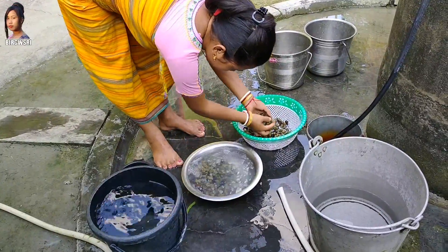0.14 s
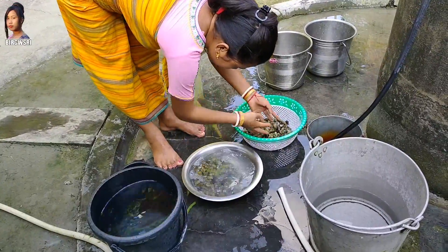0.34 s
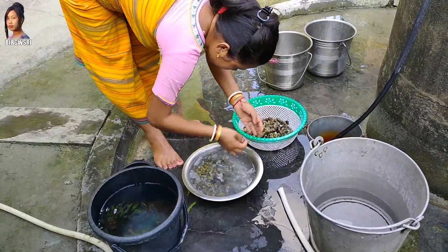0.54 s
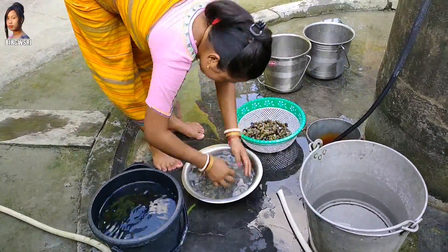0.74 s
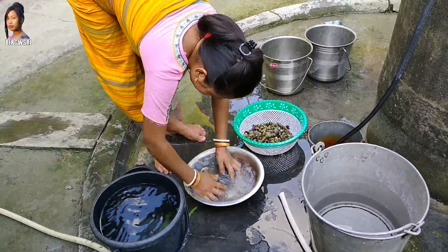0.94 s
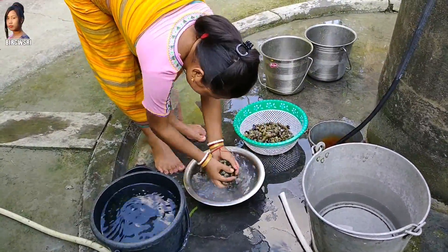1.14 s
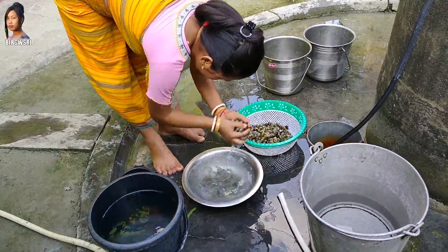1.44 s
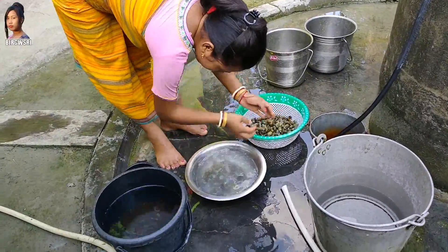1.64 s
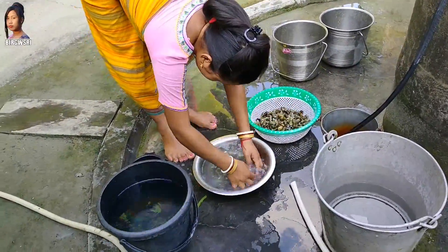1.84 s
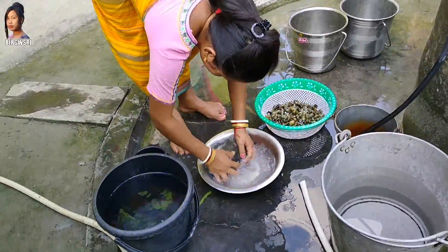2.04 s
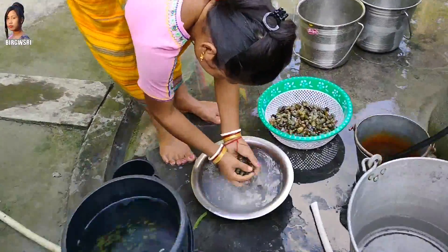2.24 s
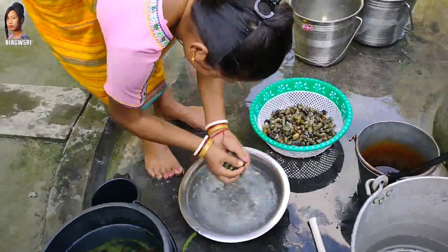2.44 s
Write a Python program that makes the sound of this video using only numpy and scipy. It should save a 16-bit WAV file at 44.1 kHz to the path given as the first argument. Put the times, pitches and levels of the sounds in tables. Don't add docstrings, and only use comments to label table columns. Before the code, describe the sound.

Handfuls of hard little snail shells rattle, scrape and drop, with small watery plops, outdoors

```python
import sys
import numpy as np
from scipy import signal
from scipy.fft import rfft, irfft, next_fast_len
from scipy.io import wavfile
from scipy.ndimage import uniform_filter1d

SR = 44100
rng = np.random.default_rng(int(sys.argv[2]) if len(sys.argv) > 2 else 0)


def boost(x):
    u = np.asarray(x, float) / 20
    return 10 ** u


def file_out(sig):
    cols = np.atleast_2d(sig).T
    lim = np.clip(cols, -1, 1)
    pcm = np.round(lim * 32767).astype(np.int16)
    wavfile.write(sys.argv[1], SR, pcm)


N = 114660
CUT_S = 0.8095


def evened(x):
    return x / np.sqrt(np.mean(x ** 2) + 1e-20)


def read(points, hz):
    point_hz, value = np.transpose(points)
    return np.interp(np.log(hz + 1), np.log(point_hz + 1), value)


def colour(x, db_of):
    log_gain = np.log(boost(db_of(abs(np.fft.fftfreq(4096, 1 / SR)))))
    taps = np.fft.ifft(np.exp(np.conj(signal.hilbert(log_gain)))).real[:2048]
    return signal.oaconvolve(x, taps[None], axes=1)[:, :N]


def wobble(grain_s):
    size = max(int(grain_s * SR), 1)
    drift = uniform_filter1d(rng.standard_normal(N), size)
    return evened(uniform_filter1d(drift, size))


def rung(x, modes):
    t = np.arange(5000) / SR
    taps = sum(boost(db - 60 * t / t60_s) * np.sin(2 * np.pi * hz * t) for hz, db, t60_s in modes)
    return evened(signal.oaconvolve(x, taps[None], axes=1)[:, :N])


# pitch_hz, density_db_per_hz
YARD_HUM = [(100, -2.5), (400, 1), (1000, -2), (2300, -17.5), (3700, 15.5), (4600, -28), (10000, -10),
            (15500, -19)]
# pitch_hz, density_db_per_hz
WIND_TONE = [(15, -9), (50, 5.5), (100, -10), (220, -13), (500, -34)]
# time_s, level_db
GUSTS = [(0.0, -49), (0.22, -51), (0.27, -41), (0.3, -52), (0.6, -47), (0.83, -51.5), (0.85, -45),
         (1.04, -40), (1.06, -61), (1.12, -35.5), (1.23, -51), (1.34, -40), (1.83, -47), (2.6, -43.5)]


def outdoors():
    t = np.arange(N) / SR
    hum = colour(rng.standard_normal((2, N)), lambda hz: read(YARD_HUM, hz) - 30 * (hz < 60))
    wind = colour(rng.standard_normal((2, N)), lambda hz: read(WIND_TONE, hz) - 40 * (hz > 700))
    hum_db = -46.5 + 3.7 * wobble(0.039) + 5 * (t > CUT_S)
    gust_db = np.interp(t, *np.transpose(GUSTS))
    return boost(hum_db) * evened(hum) + boost(gust_db) * evened(wind)


# start_s, level_db, pitch_hz, t60_s
PLOPS = [
    (0.098, -41, 395, 0.018),
    (0.832, -29.5, 480, 0.038),
    (2.385, -23, 211, 0.046),
]


def plops():
    out, t = np.zeros(N + 4000), np.arange(4000) / SR
    for start_s, level_db, pitch_hz, t60_s in PLOPS:
        at = round(start_s * SR)
        envelope = boost(level_db - 60 * t / t60_s) * np.minimum(t / 0.0016, 1)
        out[at:at + 4000] += envelope * np.sin(2 * np.pi * pitch_hz * t * (1 + 0.81 * t))
    return np.array([out[:N], 0.77 * out[:N]])


# pitch_hz, density_db_per_hz
SHELL_TONE = [(150, -25), (500, -18), (1300, -13), (2400, -1), (4200, -6.5), (6300, -0.5), (9500, -14.5),
              (15500, -38.5)]


def shell_colour(x):
    return colour(x, lambda hz: read(SHELL_TONE, hz))


# start_s, peak_db, pitch_hz, length_s, crack_db
SINGLE_KNOCKS = [(0.0746, -20, 2500, 0.0033, -5.5), (0.186, -8.5, 1870, 0.0031, -6),
                 (0.532, -2.5, 2020, 0.0011, -46), (0.747, -23, 8400, 0.0049, -23),
                 (0.752, -17, 2120, 0.0057, -6.5), (0.78, -13, 7850, 0.0044, -13), (0.7885, -7, 5570, 0.0048, -6.5),
                 (0.792, -7.5, 4470, 0.0041, -6.5), (0.827, -20.5, 1840, 0.0053, -10),
                 (0.836, -22.5, 1370, 0.007, -6.5), (0.947, -12, 2260, 0.003, -7), (1.004, -6, 2520, 0.0028, -14),
                 (1.79, -19.5, 2430, 0.011, -11), (1.939, -21, 2300, 0.0016, -16), (2.149, -13, 2170, 0.0063, -10),
                 (2.5279, 0, 1480, 0.0055, -22),
                 (2.308, -2, 1380, 0.0093, -21), (2.528, -20.5, 600, 0.024, -28), (2.536, -7.5, 1420, 0.011, -14),
         (2.519, -16.5, 2400, 0.015, 0), (2, -18, 2300, .006, -12), (.923, -27, 2400, .01, -15),
         (2.386, -21.5, 1020, 0.041, 0), (2.49, -19, 1770, 0.0093, -4), (.886, -26.5, 2640, 0.037, -13.5),
         (1.3625, -1, 3300, 0.015, -26), (2.318, -8, 2350, 0.032, -14), (.12, -27.5, 1860, 0.056, -20),
         (1.638, -6, 9000, .002, -2)]
# start_s, peak_db, pitch_hz, length_s
MORE_KNOCKS = [(0.2233, -12, 6740, 0.015), (0.2406, 7, 940, 0.0046), (0.2696, 4.5, 1136, 0.018),
               (1.05, -12, 2650, 0.02), (1.075, -7.5, 2400, 0.014), (1.116, -2.5, 2420, 0.011),
               (1.153, -5, 5670, 0.01), (1.1676, -5, 2570, 0.032), (1.265, -3, 2860, 0.017),
               (1.283, -6, 2650, 0.014), (1.323, -4.5, 2550, 0.02), (1.3615, 1, 5060, 0.011),
               (1.401, -9.5, 2720, 0.018), (1.45, -12, 2400, 0.023), (1.612, -13.5, 6160, 0.014),
               (1.643, 2, 5800, 0.0022), (2.207, -14, 2220, 0.008), (2.2315, -6.5, 2340, 0.024),
               (2.276, -0.5, 2460, 0.018), (2.429, -9.5, 2550, 0.01)]


def knocks():
    ring, crack = np.zeros((2, N + 2000)), np.zeros((2, N + 2000))
    t = np.arange(2000) / SR
    common_crack_db = -4.5
    more_knocks = [(*row, common_crack_db) for row in MORE_KNOCKS]
    for start_s, peak_db, pitch_hz, length_s, crack_db in [*SINGLE_KNOCKS, *more_knocks]:
        u = t / max(length_s, 0.001)
        envelope = np.minimum(u / 0.12, 1) * boost(peak_db - 17 * u ** 1.4)
        ring_burst, crack_burst = rng.standard_normal((2, 2, 2000)) * envelope
        radius = np.exp(-np.pi * 0.4 * pitch_hz / SR)
        poles = [1, -2 * radius * np.cos(2 * np.pi * pitch_hz / SR), radius * radius]
        tone = signal.lfilter([1, 0, -1], poles, signal.lfilter([1], poles, ring_burst))
        at = round(start_s * SR)
        ring[:, at:at + 2000] += tone * np.std(ring_burst) / np.std(tone)
        crack[:, at:at + 2000] += boost(crack_db) * crack_burst
    return boost(-11) * ring[:, :N] + boost(2.0) * shell_colour(crack)


def swarm(per_s, low_hz, high_hz, t60_s, tick, spread_db, kinds):
    size = boost(spread_db * np.minimum(rng.exponential(1, N), 4))
    hits = size * (rng.random(N) < per_s / SR)
    kind = rng.integers(0, kinds, N)
    t, out = np.arange(1500) / SR, np.zeros((2, N))
    for k in range(kinds):
        place, phase = rng.random((2, 2, 5, 1))
        ring_hz = low_hz * (high_hz / low_hz) ** place
        rings = np.sin(2 * np.pi * (ring_hz * t + phase)).sum(1) * boost(-60 * t / t60_s)
        snap = rng.standard_normal((2, len(t))) * boost(-60 * t / 0.0064)
        impact = evened(rings) + tick * evened(snap)
        out += signal.oaconvolve((hits * (kind == k))[None], impact, axes=1)[:, :N]
    return out


# time_s, swell_db
SURGES = [(0.198, 7.5), (0.2412, 15), (0.252, -10.5), (0.2711, -2), (0.2824, 4.0), (0.3004, 12),
          (0.3184, 13), (0.329, 3.8), (0.371, 4), (0.4005, 5), (0.423, 5), (0.4377, 5), (0.47, 4.2),
          (0.5327, 3), (0.756, 4), (0.7895, 7), (0.8255, 16), (1.0073, 5), (1.0357, 4.4), (1.0579, 2),
          (1.071, 10.5), (1.0854, 4.0), (1.115, 6), (1.1565, 4), (1.1741, 1.5), (1.2229, 2), (1.2366, 3),
          (1.2458, 0.5), (1.257, 0), (1.2716, 7), (1.2915, 6.5), (1.3197, 9), (1.3365, 4.5), (1.364, 4),
          (1.4065, -6), (1.426, 3), (1.4633, 4.5), (1.5442, 12), (1.6411, 13.5), (1.6566, 11.5), (1.667, 1),
          (1.7202, 5), (1.791, 11), (1.944, 7.5), (2.053, 6.5), (2.1415, 12), (2.1525, 10.5), (2.2085, 7),
          (2.2393, 5.5), (2.2669, 8), (2.2835, 6.5), (2.309, 4), (2.3653, 0), (2.3932, 4.6), (2.4225, 3),
          (2.434, 4), (2.5327, 10.7), (2.5924, 6)]


def surges(t):
    rise_s, fall_s, lull_db = 0.0018, 0.004, -1.5
    swell_db = lull_db
    for s, db in SURGES:
        swell_db = swell_db + db * np.exp(-((t - s) / np.where(t < s, rise_s, fall_s)) ** 2)
    return swell_db


# pitch_hz, density_db_per_hz
BODY_TONE = [(100, -52), (500, -26.5), (950, -8.5), (1500, 0.5), (2200, -24.5), (4000, 9.5)]
# pitch_hz, level_db, t60_s
BOWL = [(1924, 9, 0.058), (2324, -6.5, 0.027), (2420, 6, 0.065), (2695, 16, 0.018)]
# pitch_hz, level_db, t60_s
BASKET = [(795, -10, 0.21), (967, -9.5, 0.28), (1028, 1.5, 0.053), (1301, 2.5, 0.076), (1430, 3.5, 0.024),
          (1790, -27, 0.38), (2020, 24.5, 0.048)]
# pitch_hz, width_hz
BOOM = [(860, 190), (1000, 90)]
# from_s, treble_db, boom_db
DRYNESS = [
    (0, -2.5, -5.5),
    (0.798, -3, -16.5),
    (1.6, 1.5, -32),
    (1.9, -4, -17),
]
# start_s, end_s, level_db
SPLASH_TAIL = (.793, .81, -34)
# time_s, activity_db, falls_weight_db
FIRST_DROP = [
    (0, -39.5, -6),
    (.115, -47.5, -13),
    (0.138, -40.5, -10),
    (0.235, -22, -19),
    (0.24, -7, -5),
    (0.368, -10.5, -2),
    (0.442, -22.5, -2),
    (0.509, -32, -7.5),
    (.62, -48.5, -11),
]
SCOOP = [
    (.82, -45, -8.5),
    (0.92, -51, -24),
    (0.931, -32, -6),
    (1.049, -26.5, -12.5),
    (1.128, -13.5, -14.5),
    (1.26, -21.5, -8.5),
    (1.35, -25, -9),
    (1.48, -30, -6.5),
    (1.52, -37.5, -8),
]
SECOND_DROP = [
    (1.599, -37, -9.5),
    (1.623, -27.5, -8),
    (1.642, -7, -9),
    (1.677, -11, -9),
    (1.725, -24, -4),
    (1.741, -32.5, -18),
    (1.799, -42.5, -13),
    (1.83, -52, -31),
    (1.925, -47.5, -3),
]
LAST_SCOOP = [
    (1.944, -32, -11.5),
    (2.05, -30.5, -13),
    (2.128, -35, -14),
    (2.201, -26, -11.5),
    (2.237, -14, -14),
    (2.325, -17, -10.5),
    (2.358, -23.5, -11),
    (2.47, -29.5, -9),
    (2.6, -36.5, -8),
]


def shells():
    t = np.arange(N) / SR
    time_s, activity_db, weight_db = np.transpose([*FIRST_DROP, *SCOOP, *SECOND_DROP, *LAST_SCOOP])
    busy_db, weight_db = np.interp(t, time_s, activity_db), np.interp(t, time_s, weight_db)
    from_s, treble_db, boom_db = np.transpose(DRYNESS)
    handling = np.searchsorted(from_s, t, "right") - 1
    dry_db = treble_db[handling] + 0.1585 * (busy_db + 24.0)

    clicks = evened(shell_colour(swarm(2600, 1502, 12107, 0.043, 1.0, 2.55, kinds=36)))
    low = signal.sosfiltfilt(signal.butter(4, 3600, fs=SR, output="sos"), clicks)
    under = signal.sosfiltfilt(signal.butter(4, 10000, fs=SR, output="sos"), clicks)
    clicks = low + boost(dry_db) * (under - low) + boost(3.1 * dry_db) * (clicks - under)
    falls = swarm(700, 659.5, 2354, 0.026, 0.35, 1.2, kinds=20)
    falls = evened(colour(falls, lambda hz: read(BODY_TONE, hz)))

    start_s, end_s, tail_db = SPLASH_TAIL
    busy = boost(busy_db + surges(t) + 0.8 * wobble(0.007))
    busy = busy + boost(tail_db) * ((t > start_s) & (t < end_s))
    heavy = busy * boost(weight_db)
    clatter = busy * clicks + boost(-11) * rung(busy * low, BOWL) * np.std(busy)
    boom_modes = [(hz, 0, 1.8 / width_hz) for hz, width_hz in BOOM]
    boom = rung(falls, boom_modes) * boost(boom_db[handling])
    basket = rung(heavy * falls, BASKET) * np.std(heavy)
    return boost(2.5) * clatter + heavy * (falls + boom) + boost(-4.5) * basket


# pitch_hz, likeness
LIKENESS = [(60, 0.85), (300, 0.83), (650, 0.64), (1500, 0.65), (3000, 0.22), (6000, 0.25), (9000, 0),
            (12000, 0)]
# pitch_hz, level_db
LEAN = [(200, -.5), (700, -0.5), (1400, 1.2), (2400, 0.5), (5500, 5.5), (8500, -7), (12000, 3.5)]


def ports(pair):
    size = next_fast_len(N)
    hz = np.fft.rfftfreq(size, 1 / SR)
    a, b = rfft(pair, size)
    same, lean = np.clip(read(LIKENESS, hz), 0, 1), boost(read(LEAN, hz) / 2)
    u, v = np.sqrt((1 + same) / 2), np.sqrt((1 - same) / 2)
    return irfft(np.array([(u * a + v * b) * lean, (u * a - v * b) / lean]), size)[:, :N]


def scene():
    return ports(shells() + knocks() + plops() + outdoors())


# pitch_hz, width_hz, depth_db
DIPS = [(3450, 520, -10), (3740, 180, -6), (12100, 450, -8), (13800, 350, -5)]


def microphones(x):
    edge_hz = 15600
    return colour(x, lambda hz: sum(db / (1 + ((hz - f) / w) ** 2) for f, w, db in DIPS) - 50 * (hz > edge_hz))


def smoothed(x, bins, frames):
    return uniform_filter1d(uniform_filter1d(x, size=bins, axis=0), size=frames, axis=1)


# pitch_hz, margin_db
MARGIN = [(2900, -30), (3300, -6.5), (4500, -7), (7500, -6.5), (9500, -1.5), (11000, .8), (15000, 1.3)]


def thinned(x):
    hz, _, z = signal.stft(x, SR, nperseg=2048, noverlap=1536)
    power = (abs(z) ** 2).mean(0)
    band, mask = smoothed(power, 5, 2), smoothed(power, 91, 2)
    column_hz = hz[:, None]
    loud_db = np.maximum(10 * np.log10(power.sum(0) + 1e-12) + 24, 0)
    spared_db = 0.17 * loud_db * (column_hz > 5000)
    wander = evened(smoothed(rng.standard_normal(power.shape), 16, 5))
    spared_db = spared_db + 2.6 * wander * np.clip(column_hz / 9000, 0.4, 1)
    keep = band > mask * boost(read(MARGIN, hz)[:, None] - spared_db) ** 2
    return signal.istft(z * keep, SR, nperseg=2048, noverlap=1536)[1][:, :N]


def low_pass(x):
    return signal.sosfilt(signal.butter(12, 15660, fs=SR, output="sos"), x)


def record(dry):
    limit_db, cut_length_s, cut_db, ceiling = -5.5, 0.0135, -20, 0.99
    power_db = 10 * np.log10(abs(uniform_filter1d((dry ** 2).mean(0), size=300)) + 1e-12)
    limited = dry / boost(np.maximum(power_db - limit_db, 0))
    heard = thinned(microphones(limited))
    away_s = abs(np.arange(N) / SR - CUT_S - cut_length_s / 2) - cut_length_s / 2
    heard = heard * boost(cut_db * np.clip(-away_s / 0.00033, 0, 1))
    return low_pass(np.clip(heard, -ceiling, ceiling))


dry = scene()
out = record(dry)
file_out(out)
```